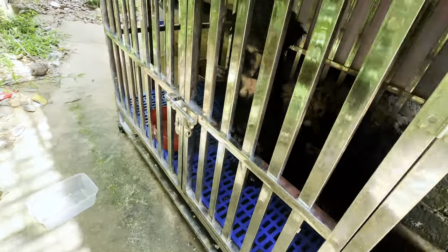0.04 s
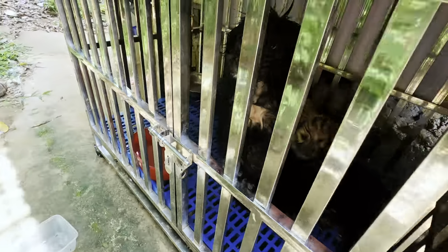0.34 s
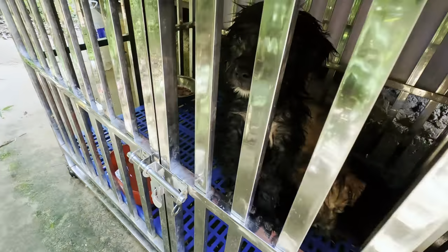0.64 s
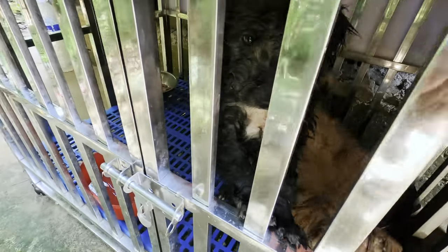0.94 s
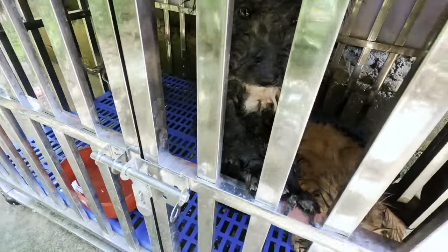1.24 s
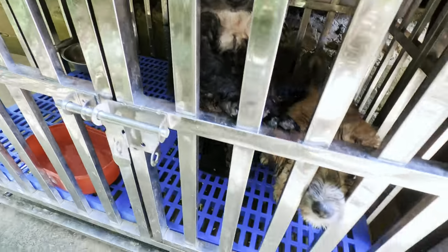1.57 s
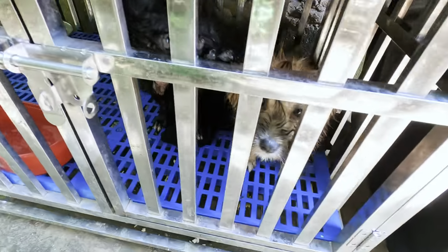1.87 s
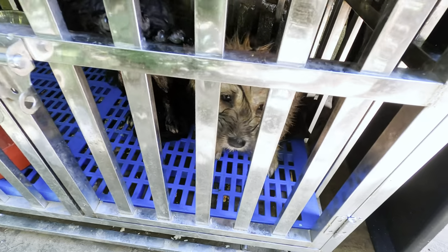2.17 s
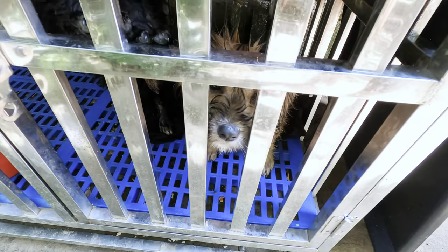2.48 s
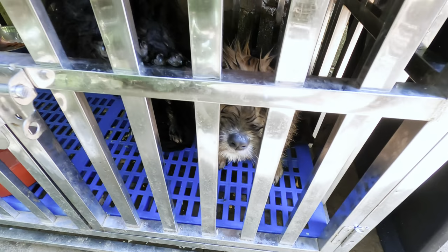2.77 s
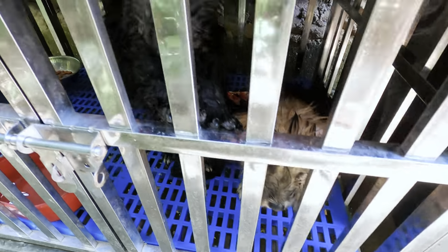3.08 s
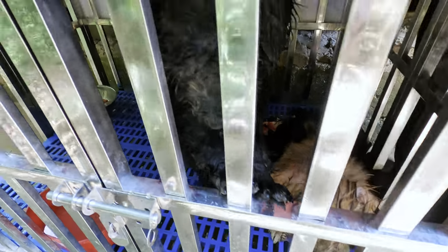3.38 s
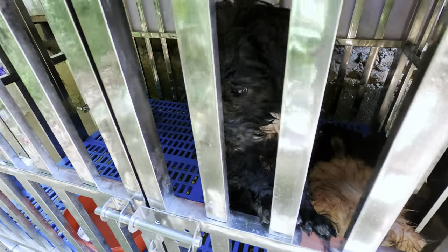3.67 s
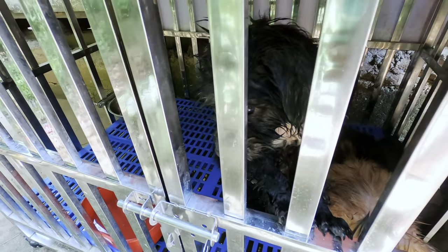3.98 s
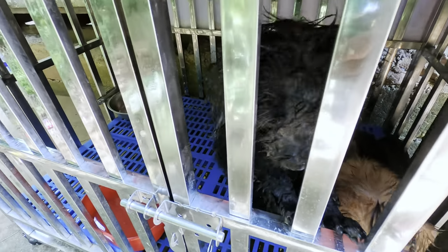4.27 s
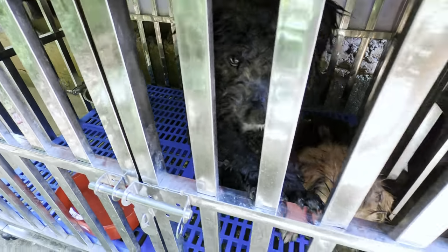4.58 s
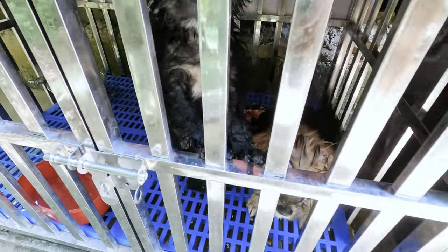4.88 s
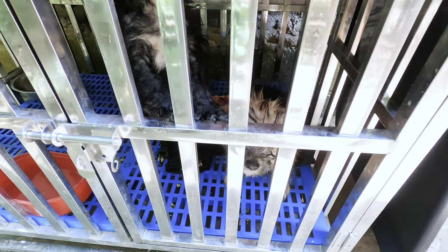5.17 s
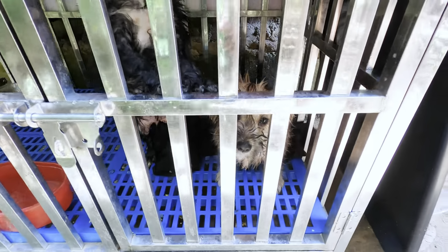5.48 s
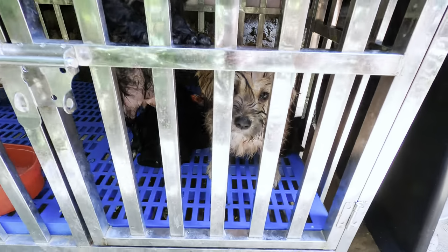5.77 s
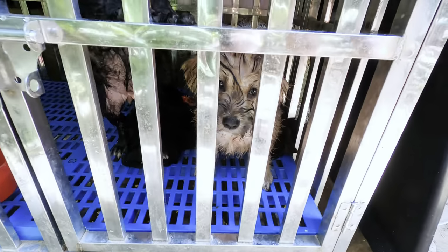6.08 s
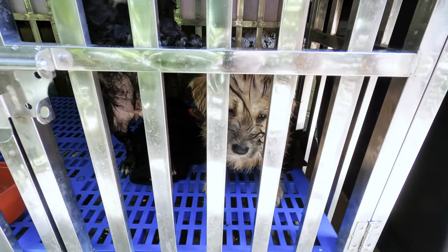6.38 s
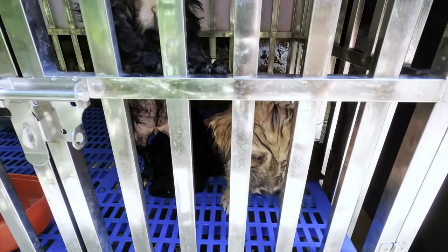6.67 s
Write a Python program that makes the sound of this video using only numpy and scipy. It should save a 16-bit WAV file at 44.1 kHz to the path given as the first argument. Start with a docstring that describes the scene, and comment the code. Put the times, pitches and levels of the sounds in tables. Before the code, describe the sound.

Soft, steady outdoor noise runs throughout, with a faint distant dog whine at the start. From 0.4 to 1.3 seconds puppies in a metal cage give short, high whines close to the microphone, sometimes cracking, edged with thin nasal whistles. Brief higher whimpers come at 1.8 and 2.3 seconds, and paws scuff faintly on a plastic floor around 3 seconds. From about 3.2 seconds wind rumbles and thumps on the microphone, more on the right, strongest between 4.4 and 4.8. Tiny sharp squeaks appear around 4 seconds and again near 6. The close whines return at 4.2 seconds and repeat roughly every half second until the end, near 7 seconds. A farther, falling whine swells around 5 seconds. A distant motor hum then grows louder while sinking in pitch, and something taps the microphone once at 5.6 seconds.

```python
"""A distant dog whines over the yard's background, then puppies cry close by in a steel cage:
their vocal folds buzz, throat and muzzle resonate, and at times the voice cracks. Thin nasal whistles
frame the cries and paws brush the plastic floor. After three seconds air buffets the microphone ports,
mostly the right one, and hard squeaks join in. Near five seconds a far whine swells; then a motor's hum
grows louder as its pitch sinks, something taps the camera once, and the puppies whine on to the end."""
import sys
import numpy as np
from scipy import signal
from scipy.fft import rfft, irfft, next_fast_len
from scipy.io import wavfile
from scipy.ndimage import uniform_filter1d, map_coordinates

SR = 44100
rng = np.random.default_rng(int(sys.argv[2]) if len(sys.argv) > 2 else 0)


def output_pcm(signal):
    """Save a mono or channel-first signal as 16-bit PCM at the path in sys.argv[1].

    Samples are clipped to [-1, 1] before scaling.
    """
    pcm = np.clip(np.atleast_2d(signal).T, -1, 1) * 32767
    wavfile.write(sys.argv[1], SR, np.round(pcm).astype(np.int16))


N = 306078

# pitch contour of each open-mouthed whine: time_s, pitch_hz
WHINE_MELODIES = [
    [(0.398, 814), (0.41, 725), (0.422, 702), (0.528, 672), (0.54, 707.6), (0.604, 674), (0.652, 697),
     (0.662, 683), (0.714, 685), (0.736, 721.5), (0.78, 738)],
    [(1.002, 910), (1.036, 754.4), (1.108, 652), (1.142, 643), (1.17, 741), (1.18, 754), (1.19, 650),
     (1.2, 710)],
    [(4.225, 1107), (4.235, 1115), (4.275, 858), (4.285, 737), (4.295, 710.5), (4.355, 643), (4.368, 675)],
    [(4.578, 933), (4.616, 688.8), (4.728, 649), (4.738, 716), (4.776, 760), (4.8, 706), (4.814, 816),
     (4.828, 661), (4.838, 670)],
    [(5.148, 766.6), (5.192, 743.7), (5.226, 838.4), (5.258, 884), (5.28, 843), (5.294, 731), (5.312, 760),
     (5.33, 892), (5.403, 869)],
    [(5.906, 837), (5.934, 782), (5.978, 881), (6.006, 847), (6.042, 914), (6.064, 905), (6.102, 812),
     (6.118, 718), (6.173, 685)],
    [(6.403, 1299), (6.433, 691), (6.445, 644), (6.459, 679), (6.487, 571.6), (6.511, 473.4), (6.545, 432)],
    [(6.76, 850), (6.798, 744), (6.83, 794), (6.868, 736), (6.94, 634)],
]
# voicing of each whine: level_db, swell_db, second_harmonic_db, overtones_db, peak_effort_share,
# droop_db, roughness_share, formant_weight, throat_tuning_ratio, nasal_db, edge_db, hiss_db, ring_db
WHINE_VOICINGS = [(-21, 5.5, -9.5, -2.5, 0.76, 0.5, 0.01, 1.16, 1.02, 11.5, 0.5, 11, -3),
                  (-18.5, 2, -9, 4, 0.04, 4, .05, 1.5, 0.97, 7, 3, 2.5, -4.5),
                  (-21, 3, -4.5, 8.5, 0.47, 16.5, 0.08, 1.33, 1.006, -4, -4, 2.5, -3.5),
                  (-19.5, -0.5, -8.5, 5, 0, 1.5, 0.06, 1.77, 0.98, 0, -14.5, 7.5, -2.5),
                  (-22, 2.5, -7, 0, 0.5, 9.5, 0.15, 1.56, 0.926, -6, -4.5, 1, 4.5),
                  (-27, 4, -5, 5, 0.8, 2, 0.12, 0.054, 0.985, 2, -6.5, 4.5, 2.5),
                  (-21, -2, -8.5, -2, 0, 3.5, 0.12, 1.03, 1.02, 7, -17, 14.5, 0.5),
                  (-23, 2.5, -3, 7.5, 0.05, 0.5, 0.1, 0.65, 0.976, -.5, -8, -14, 1.5)]
# closed-mouth whimpers: start_s, end_s, first_hz, middle_hz, last_hz, then the voicing columns
WHIMPERS = [(0.444, 0.502, 1072, 1203, 1350, -30.5, 9, -21, -6, .5, 2, .15, .3, 1.2, 0, -15, 0, -5),
            (.895, 1.003, 1330, 1365, 1331, -29.5, 9, 4.5, 9, 0.33, 1, 0.11, 0.79, .9, 7, -1.5, 7, -8),
            (1.793, 1.919, 1073, 1231, 1130, -23.5, 5.5, -15, -1, 0.21, 2, 0.12, 0.74, 1.11, -14, 3.5, 18, 0),
            (2.254, 2.408, 1079, 1021, 1042, -26, -6, 1, 6.5, 1, 1.2, .03, 1, .973, 13, -3.5, 1.5, -2),
            (3.587, 3.789, 1039, 961, 855, -42, -6, -8.5, 12, 0.22, 4, 0.13, 0.2, 0.938, -5, 2, 2, 2.5),
            (3.942, 3.989, 933, 1034, 814, -32, -15.5, -6, 3, 0.31, 2, 0.22, 0.34, 1.1, -3, -17, 9, -2)]
# voice cracks: start_s, end_s, period_doubling_share, roughness_share, overtone_loss_db
VOICE_CRACKS = [(0.433, 0.53, 0, 0.18, 2), (.52, 0.547, 0.05, 0.44, 4), (1.144, 1.169, 0, 0.33, 25),
                (1.818, 1.85, 0.03, 0.47, -8), (4.27, 4.325, 0.09, 0.27, 3),
                (4.682, 4.85, 0.33, 0.56, 20.5), (6.453, 6.504, 0.07, 0, 6.5), (6.482, 6.558, 1, 0.37, 1.5)]
# low resonances, shaping the first two harmonics: frequency_hz, gain_db
LOW_FORMANTS = [(430, -5), (560, -5), (660, -0.5), (750, -3), (860, -8), (1100, -8.5), (1300, 0), (1450, 1),
                (1750, -4), (2050, -21.5)]
# vocal tract response for the higher harmonics: frequency_hz, gain_db
THROAT_RESPONSE = [(700, -12), (1400, -1), (2050, -28.5), (2550, -35), (3200, -18.5), (4000, -32),
                   (4900, -22), (6000, -41.5), (7000, -40), (8600, -35), (10000, -33.5), (12000, -42.5),
                   (15000, -47)]
# turbulence in the muzzle: frequency_hz, density_db
BREATH_SPECTRUM = [(600, -40), (1200, 2.5), (2400, -14.5), (3600, -3), (5200, -1.5), (6500, -9.5),
                   (9000, -1.5), (12000, -27), (14500, -34), (16000, -29)]
# direction of the puppies as the camera moves: time_s, left_lag_samples, left_minus_right_db
PUPPY_BEARING = [(.6, 1.35, -1), (1.1, 2.17, -2), (2.3, 2.09, 2.7), (4.7, 2, -2), (5.3, 0.41, 2),
                 (6.5, 0.31, 3)]
# nasal whistles: start_s, end_s, pitch_hz, level_db
NASAL_WHISTLES = [(0.903, 0.982, 6820, -53.5), (0.984, 1.036, 6800, -45), (1.285, 1.311, 6800, -51),
                  (1.754, 1.808, 6790, -58), (1.907, 1.943, 6630, -47), (2.23, 2.262, 6800, -50),
                  (2.4, 2.441, 6830, -43), (3.092, 3.19, 6800, -54.5), (3.57, 3.79, 5980, -60.5),
                  (3.773, 3.823, 6980, -54.5), (4.191, 4.26, 6850, -52), (4.353, 4.449, 7100, -53.5),
                  (5.308, 5.4, 7100, -50.5), (6.04, 6.24, 7100, -50.5), (6.715, 6.95, 6870, -50)]
# two-tone squeaks: start_s, end_s, pitch_hz, half_glide_share, level_db, upper_hz, spray_relative_db
SQUEAKS = [(3.922, 3.947, 10560, -0.02, -42, 13370, -16), (3.969, 3.994, 10730, -0.044, -32, 13300, -10),
           (4.205, 4.221, 10070, -0.0056, -27, 13800, -18), (5.889, 5.913, 10280, 0.00053, -41, 13800, -6),
           (6.35, 6.414, 9230, -0.0145, -29, 14770, -33.5), (6.753, 6.76, 9500, 0.011, -32.5, 14360, -27)]
# strength of a squeak's upper tone: frequency_hz, relative_db
UPPER_TONE_GAIN = [(13200, -16), (14000, -30), (14800, -28.5)]
# hiss around whistles and squeaks: frequency_hz, density_db
SPRAY_SPECTRUM = [(4000, -18), (8000, -13), (10500, -11.0), (13500, 1.0), (15500, -30.5)]
# tilt of the cage's reflections: frequency_hz, gain_db
CAGE_TILT = [(700, 4.15), (3000, 13.8)]
# far whines: start_s, end_s, first_hz, middle_hz, last_hz, loudest_s, level_db, fading_db_per_s, echo_db
FAR_WHINES = [(0, 0.558, 947.5, 926, 901, 0.068, -52.5, 5, -1),
              (0.922, 1.506, 404, 388, 364, 1, -77.5, 24, -3.5),
              (4.621, 5.258, 540, 477, 383.1, 5.1, -30, 55.5, -3.5)]
# vocal tract of each far dog: frequency_hz, gain_db
FAR_THROATS = [
    [(930, 1), (1850, 11), (2800, -34), (6000, -53)],
    [(390, 17), (780, -2.5), (1170, 2), (1550, 19.5), (2300, -36), (6000, -43)],
    [(400, -18), (550, 1.5), (800, 17), (1050, 0), (1400, -0.5), (1850, -21), (2400, -44), (3250, -11),
     (4000, -22), (5000, -14), (7000, -47), (12000, -65)],
]
# gusts on the ports: centre_s, half_length_s, level_db, left_minus_right_db
GUSTS = [(0.045, 0.11, -42, 1), (2.294, 0.56, -42.5, 1), (3.233, 0.23, -35.5, -3),
         (3.818, 0.096, -32, -5.5), (4.67, 0.36, -28, -7), (5.18, 0.21, -34, -4.5),
         (5.827, 0.17, -35.5, -1), (6.29, 0.29, -40.5, 3)]
# rumble of the eddies: frequency_hz, density_db
EDDY_SPECTRUM = [(12, -27.5), (20, 8.5), (43, 5.5), (92, -2.5), (167, -8), (304, -29), (356, -26.5),
                 (450, -28), (580, -60), (990, -120)]
# sharp puffs of air, before each port's gain: time_s, level_db
AIR_PUFFS = [(3.32, -19), (3.341, -23), (3.369, -17), (3.835, -28), (4.444, -18.5), (4.476, -19.5),
             (4.506, -23), (4.607, -15.5), (4.732, -14), (4.751, -17), (4.77, -14.5), (5.802, -23.5),
             (5.837, -17)]
# the tap on the camera: time_s, level_db
CASE_TAP = [(5.632, -20)]
# modes of the camera's case: frequency_hz, level_db, t60_s
CASE_MODES = [(250, 5, 0.012), (477, 5, 0.0099), (5050, -5.5, 0.0035), (6730, 0, 0.0061),
              (8650, -11, 0.0056), (13500, -16, .004)]
# strokes of paws and fur on the floor: centre_s, half_length_s, level_db
PAW_STROKES = [(1.443, 0.12, -59), (2.626, 0.011, -49), (2.8, .04, -58.5), (2.85, 0.099, -51.5),
               (3.12, 0.056, -55), (3.375, 0.2, -54), (4.13, 0.019, -52), (5.738, 0.073, -51)]
# friction on plastic: frequency_hz, density_db
FRICTION_SPECTRUM = [(400, -11), (1400, 3.5), (2600, -2), (4200, -1), (8000, -21), (15000, -30)]
# the motor's rough burr: frequency_hz, density_db
BURR_SPECTRUM = [(100, -48.0), (170, -11.0), (240, 0.5), (290, -21.5), (500, -28.5), (1500, -93)]
# decay of the diffuse echo: frequency_hz, t60_s
REVERB_TIMES = [(200, 0.2), (1500, 0.75), (6000, 0.89), (14000, 0.031)]
# outdoor background: frequency_hz, density_db
YARD_SPECTRUM = [(24, -41), (40, -2.5), (117, -7), (146, -16.5), (235, -17), (325, -23), (472, -23.5),
                 (548, -25.5), (703, -26.5), (858, -29.5), (1100, -24), (2050, -25.5), (2440, -26),
                 (6790, -35.5), (15500, -56.5)]
# likeness of that background at the two ports: frequency_hz, correlation
YARD_CORRELATION = [(60, 1), (180, 0.82), (550, 0.73), (1650, 0.53), (4970, 0.16), (15000, -0.4)]

ATTACK_DB, ATTACK_S, RELEASE_DB, RELEASE_S = 8.5, 0.0083, 8.5, 0.012  # depths and time constants
CATCH_ROUGH, CATCH_S = .3, .012  # the folds rattle until they settle
SAG_SHARE, SAG_S = 0.058, 0.0079  # the pitch drops as the pressure gives out
CRACK_DIP_DB, CRACK_FADE_S = 2.5, 0.015
SECOND_FOLLOWS, RASP_FOLLOWS = 0.34, 0.15  # shares: of effort in harmonic 2, of a crack's loss in rasp
STRAIN_RAD, VOICE_TOP_HZ = 2.1, 13300  # phase shake at 2700 Hz at full roughness; overtone roll-off
WHISTLE_ARCH, SQUEAK_ARCH = .015, 0.0088  # share by which the ends lie below the middle pitch
MOTOR_HZ, MOTOR_END_HZ, MOTOR_SLOWS_AT_S, MOTOR_SLOWING_S = 224.4, 186, 5.1, 1
MOTOR_DB, MOTOR_IDLE_DB, MOTOR_RISES_AT_S, MOTOR_RISE_S = -43, -64, 5.23, 0.83


def cry(start, end, melody, voicing, air, jitter_hz=10, flutter=0.22, blur=0.13, rasp_db=-24,
        air_db=-41, drift_db=4.5, waver_db=1.1, shimmer_db=0.43, fade_s=.006):
    """Source and filter: the throat shapes the vocal folds' harmonics; strain adds shake and hiss."""
    (level_db, swell_db, second_db, overtones_db, peak, droop_db, rough,
     resonance, tuning, nasal_db, edge_db, hiss_db, ring_db) = voicing
    t, window = gate(start + fade_s / 2, end - fade_s, fade_s)
    age, remaining = np.clip(t - start, 0, None), np.clip(end - t, 0, None)
    progress = age / (end - start)
    doubling, crack_rough, loss_db = cracks(t)
    db = level_db + swell_db * (progress - .5) - CRACK_DIP_DB * crack_rough
    db -= ATTACK_DB * np.exp(-age / ATTACK_S) + RELEASE_DB * np.exp(-remaining / RELEASE_S)
    effort_db = -droop_db * (2 * (progress - peak)) ** 2 - loss_db
    bright_db = overtones_db + effort_db
    rough = np.clip(rough + crack_rough + CATCH_ROUGH * np.exp(-age / CATCH_S), 0, 1)
    pitch = melody(t) * (1 + 0.0066 * wobble(72.44, len(t))) + jitter_hz * rough * wobble(256.2, len(t))
    pitch *= 1 - SAG_SHARE * np.exp(-remaining / SAG_S)
    phase = cycle(pitch)
    muzzle = [(1500, 0), (2100, nasal_db), (3100, 0), (4900, ring_db), (6000, 0), (8000, edge_db)]
    voice = amp(resonance * along(LOW_FORMANTS, pitch) + shimmer_db * wobble(30.5, len(t)))
    voice *= np.sin(phase)
    for k in range(2, 24):
        hz = k * pitch
        if k == 2:
            gain_db = resonance * along(LOW_FORMANTS, hz) + second_db + SECOND_FOLLOWS * effort_db
            gain_db += waver_db * wobble(23, len(t))
        else:
            gain_db = along(THROAT_RESPONSE, hz / tuning) + along(muzzle, hz) + bright_db
            gain_db += drift_db * min(1, k / 6) * wobble(29.6, len(t))
        # uneven cycles smear the highest overtones into noise
        smear = (blur * (hz / 7000) ** 2 + STRAIN_RAD * rough ** 1.5 * hz / 2700) * wobble(450, len(t))
        gain = amp(gain_db) / (1 + (hz / VOICE_TOP_HZ) ** 20)
        voice += gain * np.sin(k * phase + smear + rng.uniform(0, 2 * np.pi))
    voice *= 1 + flutter * rough * wobble(500, len(t))
    hiss = filtered(air[round(t[0] * SR):][:len(t)], lambda hz: amp(along(muzzle, hz)))
    rasp = amp(rasp_db) * rough * amp((1 - RASP_FOLLOWS) * loss_db)
    # turbulence escapes once a cycle
    hiss *= (1 + 0.66 * np.sin(phase)) * amp(bright_db + hiss_db) * (amp(air_db) + rasp)
    alternation = 1 + doubling * np.sin(phase / 2)
    return t[0], (np.sqrt(2) * voice + hiss) * alternation * amp(db) * window


def cracks(t):
    """Irregular vibration: period doubling (an octave down), roughness and overtone loss at times t."""
    return sum(np.outer(effects, np.clip(np.minimum(t - start, end - t) / CRACK_FADE_S, 0, 1))
               for start, end, *effects in VOICE_CRACKS)


def puppies():
    """Phonation: whines and whimpers, each heard from its own bearing."""
    out, air = np.zeros((2, N)), noise(BREATH_SPECTRUM)
    cries = [cry(melody[0][0], melody[-1][0], lambda t: curves(melody, t)[0], voicing, air)
             for melody, voicing in zip(WHINE_MELODIES, WHINE_VOICINGS)]
    for start, end, first, middle, last, *voicing in WHIMPERS:
        cries.append(cry(start, end, lambda t: arch(t, start, end, [first, middle, last]), voicing, air))
    for start, sound in cries:
        lag, balance_db = curves(PUPPY_BEARING, start + len(sound) / SR / 2)
        for port, heard in zip(out, place(sound, lag, balance_db / 2)):
            add(port, start, heard)
    return out


def noses(air_db=-12.5, spray_fade_s=.012):
    """Flow through a narrow gap whistles and hisses; hard squeaks sound two tones."""
    out, spray = np.zeros(N), noise(SPRAY_SPECTRUM)
    for start, end, hz, db in NASAL_WHISTLES:
        glide = hz * (1 - WHISTLE_ARCH * np.array([1, 0, 1]))
        add(out, *whistle(start, end, glide, db, waver=0.012, fade_s=0.02))
        t, window = gate(start + .012, end - .006, spray_fade_s)
        add(out, t[0], amp(db + air_db) * window * spray[round(t[0] * SR):][:len(t)])
    for start, end, hz, slide, db, upper_hz, spray_db in SQUEAKS:
        glide = hz * np.array([1 - SQUEAK_ARCH - slide, 1, 1 - SQUEAK_ARCH + slide])
        add(out, *whistle(start, end, glide, db, waver=0.012, fade_s=0.0084))
        upper_db = db + along(UPPER_TONE_GAIN, upper_hz)
        add(out, *whistle(start, end, [upper_hz] * 3, upper_db, waver=.008, fade_s=0.0057))
        t, window = gate(start + 0.0066, end - .006, spray_fade_s)
        add(out, t[0], amp(db + spray_db) * window * spray[:len(t)])
    return out


def whistle(start, end, glide, db, waver, fade_s):
    """Random modulation of pitch and level broadens a thin, swelling tone."""
    t, window = gate(start + fade_s, end - fade_s / 2, fade_s)
    progress = np.clip((t - start) / (end - start), 0, 1)
    hz = arch(t, start, end, glide)
    tone = np.sin(cycle(hz * (1 + waver * wobble(900, len(t)))))
    swell_db = 5 * (np.sin(np.pi * progress) - 1)
    return t[0], np.sqrt(2) * amp(db + swell_db + 3.2 * wobble(90, len(t))) * window * tone


def cage(x, echo_db=-19, count=8):
    """Early reflection: bars, floor and back wall return bright copies within 20 ms."""
    echoes = np.zeros((2, SR // 50))
    for port in echoes:
        port[rng.integers(SR // 1000, len(port), count)] = rng.choice([-1, 1], count) / np.sqrt(count)
    bright = filtered(x, lambda hz: amp(along(CAGE_TILT, hz)))
    return amp(echo_db) * signal.fftconvolve(bright[None], echoes, axes=1)[:, :N]


def far_whine(row, throat, tremble=0.0083, reference_hz=460):
    """Source and filter: a sinking whine, its level set on harmonic 2; higher voices tremble more."""
    start, end, first, middle, last, loudest, level_db, fading_db_per_s = row
    t, window = gate(start, end, 0.034)
    pitch = arch(t, start, end, [first, middle, last])
    db = level_db - fading_db_per_s * np.abs(t - loudest)
    phase = cycle(pitch * (1 + tremble * pitch / reference_hz * wobble(90.8, len(t))))
    tone = sum(amp(along(throat, k * pitch) + 4.7 * wobble(25.95, len(t))) * np.sin(k * phase)
               for k in range(1, 14))
    out = np.zeros(N)
    add(out, t[0], np.sqrt(2) * amp(db - along(throat, 2 * pitch)) * window * tone)
    return out


def buffeting(shared=0.92, swing_db=3.4, puff_hz=100, puff_life_s=0.008):
    """Turbulent pressure: eddies rumble on the ports, and the sharpest arrive as short puffs."""
    white = rng.standard_normal((2, N)) + shared * rng.standard_normal(N)
    eddies = filtered(white, lambda hz: amp(along(EDDY_SPECTRUM, hz)))
    rumble = unit(eddies * amp(swing_db * wobble(16, N))) * wind_strength()
    puffs, t = np.zeros(N), np.arange(SR // 12) / SR
    envelope = t / puff_life_s * np.exp(1 - t / puff_life_s)
    for start, db in AIR_PUFFS:
        swirl = np.sin(cycle(puff_hz * np.exp(0.63 * wobble(164, len(t)))))
        add(puffs, start - .003, amp(db) * envelope * swirl)
    return rumble + puffs * amp([[-11], [1]])  # puffs strike the right port harder


def wind_strength(calm_db=-55):
    """Addition of powers: gusts swell and die over the calm, unequally at the two ports."""
    t = np.arange(N) / SR
    power = sum(amp(db + np.array([[side_db], [-side_db]]) / 2) ** 2 * np.exp(-((t - s) / half) ** 2)
                for s, half, db, side_db in GUSTS)
    return np.sqrt(amp(calm_db) ** 2 + power)


def tap(click_t60_s=0.0068):
    """Impact excites the damped modes of the camera's case, with a dry click of noise."""
    out, t = np.zeros(N), np.arange(SR // 20) / SR
    ring = sum(amp(db - 60 * t / t60) * np.sin(2 * np.pi * hz * t) for hz, db, t60 in CASE_MODES)
    for start, db in CASE_TAP:
        click = 0.11 * amp(-60 * t / click_t60_s) * rng.standard_normal(len(t))
        add(out, start, amp(db) * (ring + click))
    return out


def scuffs():
    """Sliding friction: paws and fur on plastic make short strokes of grainy noise."""
    envelope = np.zeros(N)
    for centre, half, db in PAW_STROKES:
        add(envelope, centre - half, amp(db) * np.hanning(round(2 * half * SR)))
    return envelope * unit(noise(FRICTION_SPECTRUM) * amp(2.2 * wobble(220, N)))


def motor():
    """Pitch follows rotation: a distant motor runs down while its hum and burr grow louder."""
    t = np.arange(N) / SR
    slowing = np.exp(-np.clip(t - MOTOR_SLOWS_AT_S, 0, None) / MOTOR_SLOWING_S)
    hz = MOTOR_END_HZ + (MOTOR_HZ - MOTOR_END_HZ) * slowing
    rise = np.clip((t - MOTOR_RISES_AT_S) / MOTOR_RISE_S, 0, 1)
    db = MOTOR_IDLE_DB + (MOTOR_DB - MOTOR_IDLE_DB) * rise
    phase = cycle(hz * (1 + 0.0107 * wobble(40, N)))
    hum = np.sin(phase) + amp(-19.0) * np.sin(2 * phase)
    burr = amp(-2) * noise(BURR_SPECTRUM)
    return amp(db + 1.8 * wobble(31, N)) * (hum + burr)


def reverberate(x):
    """Diffuse reflection from cage and walls decays exponentially, each band at its own rate."""
    hz, t, bands = signal.stft(rng.standard_normal((2, SR // 2)), SR, nperseg=256)
    tail = signal.istft(bands * amp(-60 * t / along(REVERB_TIMES, hz)[:, None]), SR, nperseg=256)[1]
    return signal.fftconvolve(x[None], tail / np.linalg.norm(tail[0]), axes=1)[:, :N]


def yard(level_db=-45, drift_db=0.26, patchy_db=2.5):
    """Partial coherence: faintly patchy outdoor noise, most alike at the two ports in the bass."""
    bands = signal.stft(rng.standard_normal((2, N)), nperseg=512)[2]
    patches = uniform_filter1d(rng.standard_normal(bands.shape[1:]), size=8, axis=0)
    patches = uniform_filter1d(patches, size=16, axis=1)
    pair = signal.istft(bands * amp(patchy_db * unit(patches)), nperseg=512)[1][:, :N]
    angle = lambda hz: np.arccos(np.clip(along(YARD_CORRELATION, hz), -1, 1)) / 2
    response = lambda hz: amp(along(YARD_SPECTRUM, hz)) * [np.cos(angle(hz)), np.sin(angle(hz))]
    mid, side = filtered(pair, response)
    return amp(level_db + drift_db * wobble(2.08, N)) * unit(np.array([mid + side, mid - side]))


def place(x, lag_samples, left_db):
    """Time and level differences give direction: the left port lags, and gains what the right loses."""
    delays = lambda hz: np.exp(1j * np.pi * hz / SR * lag_samples * np.array([[-1], [1]]))
    return filtered(x, delays) * amp([[left_db], [-left_db]])


def amp(db):
    """Decibels to amplitude ratio."""
    return 10 ** (np.asarray(db) / 20)


def unit(x):
    """Normalisation to rms 1."""
    return x / np.sqrt(np.mean(x ** 2) + 1e-20)


def along(points, hz):
    """Interpolation on a logarithmic frequency axis."""
    frequencies, values = np.transpose(points)
    return np.interp(np.log(hz + 1), np.log(frequencies + 1), values)


def curves(rows, t):
    """Linear interpolation of each column after the time."""
    times, *columns = np.transpose(rows)
    return [np.interp(t, times, column) for column in columns]


def arch(t, start, end, pitches):
    """Parabolic glide through a first, middle and last pitch."""
    return np.polyval(np.polyfit([0, .5, 1], pitches, 2), np.clip((t - start) / (end - start), 0, 1))


def cycle(hz):
    """Phase as the integral of frequency."""
    return 2 * np.pi * np.cumsum(hz) / SR


def wobble(rate, size, count=2048):
    """Smooth random modulation, rate knots a second."""
    knots = rng.standard_normal(count)[:int(size * rate / SR) + 4]
    grid = np.arange(0, len(knots), 1 / 4)
    return np.interp(np.arange(size) * (rate / SR), grid, map_coordinates(knots, [grid], mode="mirror"))


def filtered(x, response):
    """Filtering as multiplication of the spectrum by a response."""
    size = x.shape[-1]
    padded = next_fast_len(size + SR // 20, True)
    return irfft(rfft(x, padded) * response(np.fft.rfftfreq(padded, 1 / SR)), padded)[..., :size]


def noise(spectrum):
    """Spectrally shaped noise of rms 1."""
    return unit(filtered(rng.standard_normal(N), lambda hz: amp(along(spectrum, hz))))


def gate(start, end, fade_s):
    """The times of a sound and its window with raised-cosine edges."""
    t = np.arange(max(0, int((start - fade_s) * SR)), min(N, int((end + fade_s) * SR))) / SR
    ramp = np.clip(np.minimum(t - start + fade_s, end + fade_s - t) / fade_s, 0, 1)
    return t, np.sin(np.pi / 2 * ramp) ** 2


def add(track, start_s, x):
    """Superposition of x on the track from start_s."""
    span = track[round(start_s * SR):][:len(x)]
    span += x[:len(span)]


def scene():
    """Superposition: near cries almost dry, far whines more reverberant, over the background."""
    near = puppies() + place(noses(), lag_samples=1.0, left_db=1.0)
    far, far_echo = np.zeros(N), np.zeros(N)
    for (*row, echo_db), throat in zip(FAR_WHINES, FAR_THROATS):
        whine = far_whine(row, throat)
        far += whine
        far_echo += amp(echo_db) * whine
    early = near + cage(near.mean(0)) + place(far, lag_samples=1.6, left_db=1.6)
    diffuse = reverberate(amp(-29.5) * near.mean(0) + far_echo)
    return early + diffuse + scuffs() + motor() + tap() + yard() + buffeting()


def record(dry):
    """Band limiting: the camera passes nothing above 15650 Hz."""
    return filtered(dry, lambda hz: hz < 15650)


dry = scene()
out = record(dry)
output_pcm(out)
```